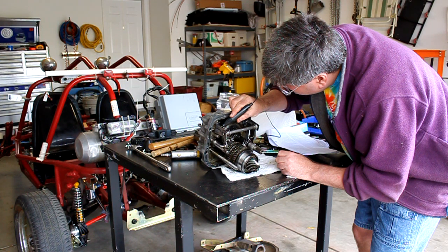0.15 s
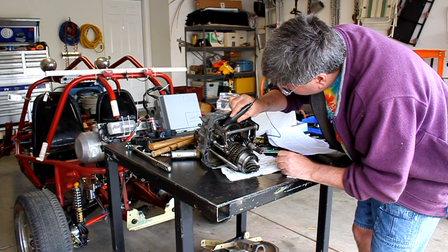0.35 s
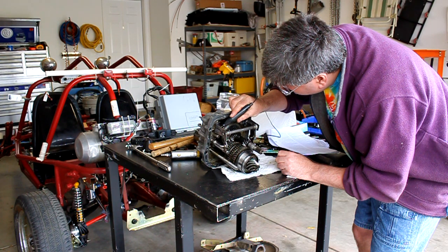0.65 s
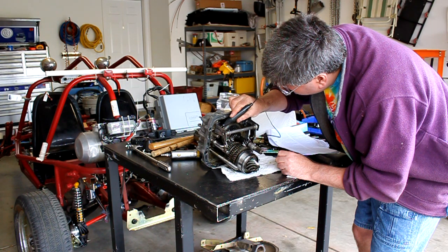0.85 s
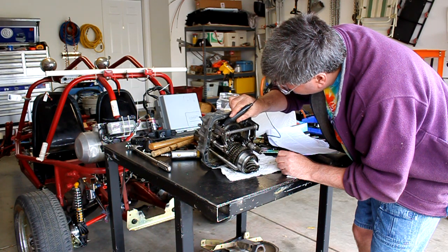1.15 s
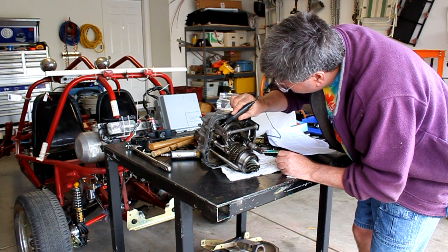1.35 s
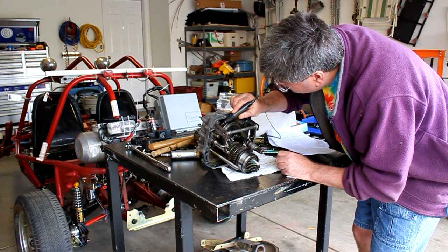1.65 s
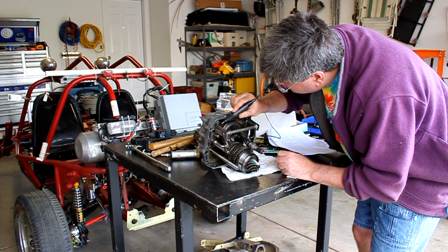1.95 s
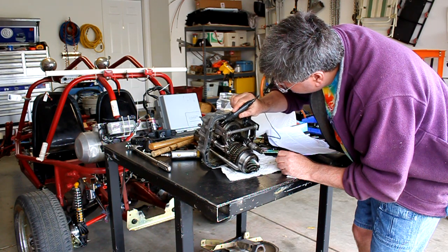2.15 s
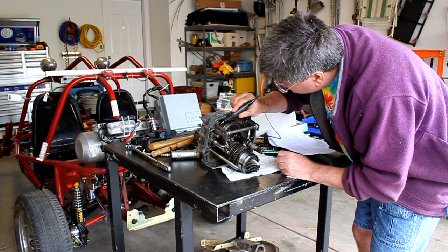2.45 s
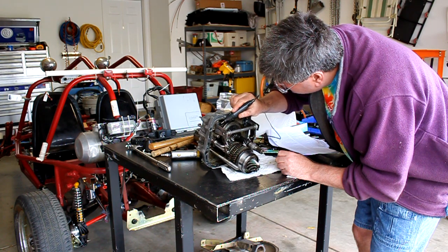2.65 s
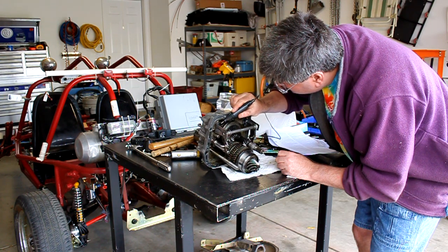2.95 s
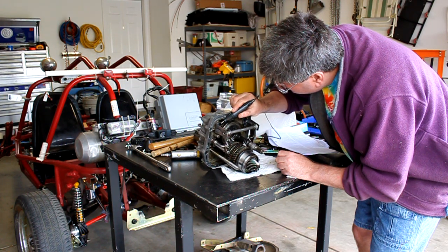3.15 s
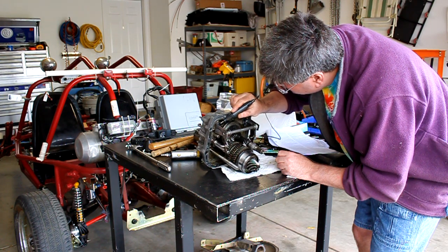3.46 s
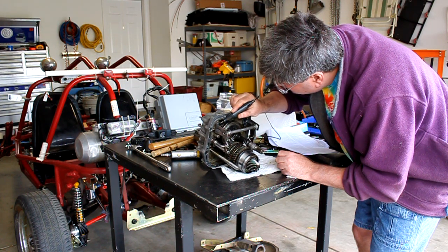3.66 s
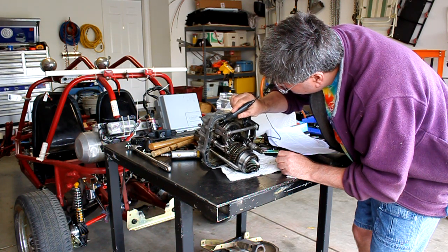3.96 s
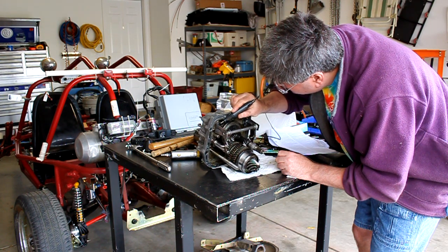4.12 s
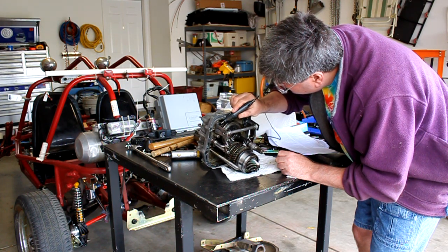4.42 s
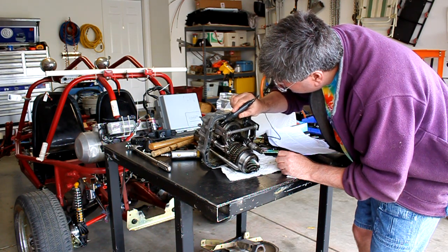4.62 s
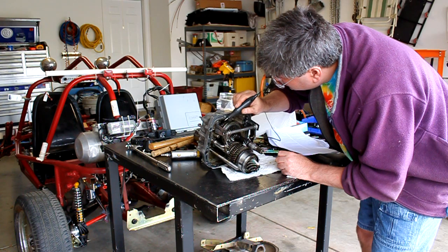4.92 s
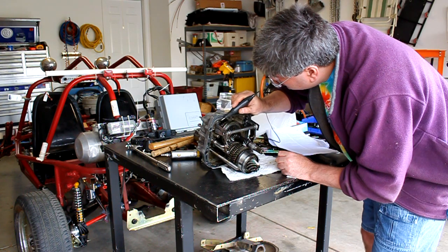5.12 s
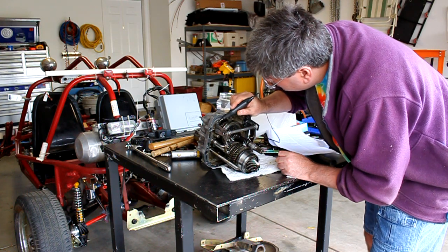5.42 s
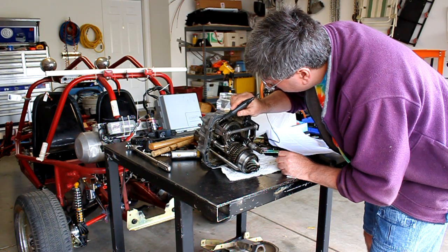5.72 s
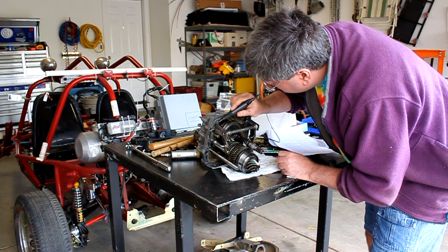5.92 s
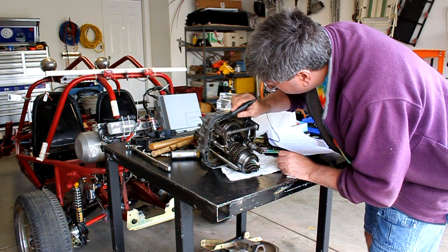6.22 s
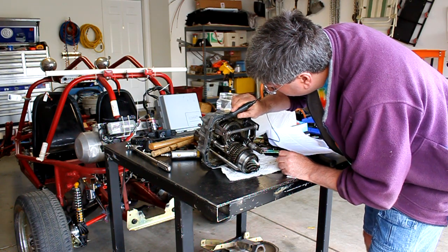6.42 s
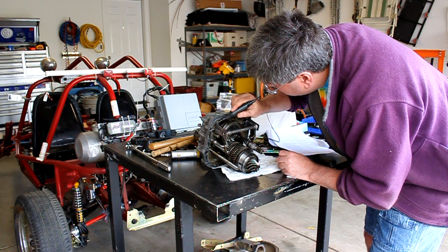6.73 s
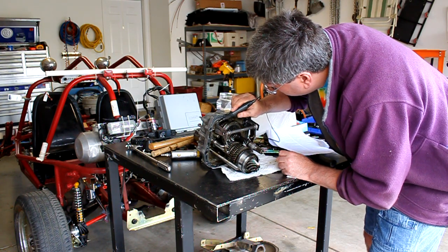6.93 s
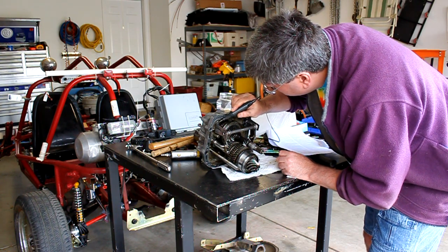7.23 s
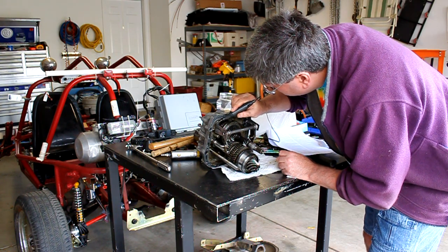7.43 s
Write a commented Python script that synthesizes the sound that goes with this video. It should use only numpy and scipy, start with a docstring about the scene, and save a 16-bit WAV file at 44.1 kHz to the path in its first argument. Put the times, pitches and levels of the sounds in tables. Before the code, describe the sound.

A small electric engraving tool whirs steadily and grinds against a steel part in short, gritty bursts in a garage.

```python
"""A small handheld rotary tool, pressed in nine bursts against a steel gear assembly in a garage.
The motor whirs on whole and half shaft orders, with air noise and a rotor-slot whine. Contact slows the
shaft, rings the part on whole orders and tears off chips: bright grit that pulses once a turn.
Single orders sing on resonances. Two soft bench knocks, quiet room tone, a short reverb; mono."""
import sys
import numpy as np
from scipy import signal
from scipy.fft import rfft, irfft, next_fast_len
from scipy.io import wavfile
from scipy.ndimage import uniform_filter1d, map_coordinates

SR = 44100
rng = np.random.default_rng(int(sys.argv[2]) if len(sys.argv) > 2 else 0)


def pcm_store(signal):
    """Save signal as 16-bit PCM."""
    levels = np.round(np.clip(np.atleast_2d(signal), -1, 1) * 32767)
    wavfile.write(sys.argv[1], SR, levels.astype(np.int16).T)


N = 334278
IDLE_HZ = 259.8

# One list per contact. Each row: time in seconds, shaft speed in Hz, part ring in dB, chips in dB.
CONTACTS = [
    [(0.0, 242, -23, -26), (0.04, 241.5, -21.5, -19), (0.072, 241.9, -25.5, -22), (0.229, 244.5, -28, -24),
     (0.284, 242.7, -29, -26), (0.332, 245, -25.5, -21.5), (0.46, 241.2, -28, -21),
     (0.57, 244.5, -26.5, -21.5), (0.62, 248.9, -28, -24.5), (0.693, 252.5, -26.5, -28),
     (0.713, 251.7, -22, -18), (0.733, 253.5, -33, -34), (0.768, 254.8, -25.5, -24), (0.79, 256, -33, -42),
     (0.84, 257.8, -36, -46)],
    [(0.9, 256, -34, -38), (0.965, 253.5, -29, -29), (1.05, 248.2, -29, -28), (1.11, 247.5, -29, -31),
     (1.19, 255, -45, -52)],
    [(2.5, 258.2, -38, -34), (2.555, 260.5, -27, -29), (2.62, 256.8, -32.5, -38),
     (2.645, 256.7, -26.5, -24), (2.76, 249.2, -23.5, -23), (2.83, 247, -23, -20),
     (2.88, 238.5, -23, -20.5), (2.95, 225.3, -23.5, -22.5), (3.05, 230.6, -26, -21.5),
     (3.16, 243, -25.5, -24.5), (3.215, 245.2, -20.5, -19.5), (3.28, 254.7, -40, -50)],
    [(3.35, 257.6, -39, -46), (3.377, 257.5, -26.5, -30), (3.457, 252.8, -27, -24.5),
     (3.5, 251.2, -27.5, -30), (3.78, 256.6, -28.5, -33.5), (3.86, 253.8, -28, -33),
     (3.92, 259.7, -46, -57)],
    [(4.065, 258.3, -23, -28), (4.085, 254.3, -22, -18.5), (4.13, 244.5, -23, -23.5),
     (4.171, 241.8, -27.5, -28), (4.2, 239.2, -24, -22), (4.28, 236, -28, -27.5), (4.31, 235.2, -21, -18.5),
     (4.4, 236.5, -24, -22.5), (4.45, 244, -24.5, -22), (4.58, 258, -37, -45)],
    [(4.9, 259.4, -36, -34.5), (5.26, 257.5, -45, -40), (5.29, 257.7, -32.5, -38.5),
     (5.757, 259.3, -35.5, -33.5), (5.88, 259.6, -32, -34), (5.92, 259.8, -33, -44)],
    [(6.292, 257.5, -24, -28), (6.306, 257.7, -24.5, -28), (6.331, 257.2, -27, -28),
     (6.366, 256.2, -19.5, -25.5), (6.41, 252.7, -25, -30), (6.46, 254.2, -32, -52)],
    [(6.475, 254.3, -26, -42), (6.495, 255.1, -23.5, -24.5), (6.554, 257.6, -29, -40),
     (6.59, 253.6, -21.5, -23.5), (6.67, 250, -22.5, -24), (6.71, 245.6, -21.5, -24),
     (6.775, 247.2, -20.5, -20), (6.88, 240.3, -23.5, -19.5), (6.94, 243, -25.5, -28.5),
     (6.99, 248.3, -38, -41)],
    [(7.02, 252.7, -37.5, -34), (7.059, 250.4, -21, -22), (7.089, 247.1, -27.5, -24),
     (7.13, 241.1, -22, -22), (7.19, 241.2, -23, -24.5), (7.25, 250.3, -27, -31.5),
     (7.333, 248.5, -20.5, -19), (7.368, 251.4, -24.5, -30.5), (7.443, 248.5, -29, -29),
     (7.52, 245.5, -25.5, -27), (7.62, 247, -23, -26)],
]
# Background level: motor, whine and room tone dip at times and creep slowly back. Each row: time in seconds,
# level in dB, half-order trim in dB.
BACKGROUND_LEVELS = [(0, -31, -17), (.85, -35.5, -5), (1.3, -34, -2), (2.5, -31, 1.5), (2.75, -32, 0),
                     (3.3, -32, -1), (3.95, -30, -3.5), (4.5, -32.5, -2.5), (4.9, -29.5, -2),
                     (4.95, -30, -22), (5.25, -29.5, -18), (5.3, -31.5, -9), (5.7, -29, 2),
                     (6.4, -28.5, -4), (7.0, -33, 3.5), (7.58, -32, -12)]


def amp(db):
    """Decibels to gain."""
    return 10 ** (np.asarray(db) / 20)


def unit_rms(x):
    """Scale to rms 1."""
    return x / np.sqrt(np.mean(x ** 2) + 1e-20)


def curves(rows):
    """Per-sample curve of each column after the first, which is time in seconds."""
    times_s, *columns = np.transpose(rows)
    return [np.interp(np.arange(N) / SR, times_s, column) for column in columns]


def colour(x, spectrum):
    """Filter by (Hz, dB) points, -90 dB outside them, then scale to rms 1."""
    size = next_fast_len(N)
    hz, db = np.transpose(spectrum)
    bins_hz = np.fft.rfftfreq(size, 1 / SR)
    gain = amp(np.interp(np.log(bins_hz + 1), np.log(hz), db, -90, -90))
    return unit_rms(irfft(rfft(x, size) * gain, size)[:N])


def wander(smooth_s):
    """Smooth random curve, rms 1."""
    width = max(int(smooth_s * SR), 2)
    return unit_rms(uniform_filter1d(uniform_filter1d(rng.standard_normal(N), width), width))


def repeating(cycles, gains, hold, drift, size=1024):
    """Cyclic wave with these harmonic gains; power share `drift` is renewed every `hold` cycles."""
    fresh = rng.standard_normal((2100, len(gains), 2)) @ [1, 1j] / np.sqrt(2)
    steady = np.exp(2j * np.pi * rng.random(len(gains)))
    harmonics = gains * (np.sqrt(1 - drift) * steady + np.sqrt(drift) * fresh)
    waves = irfft(np.pad(harmonics, ((0, 0), (1, 0))), size, axis=1)
    waves = np.concatenate([waves, waves[:, :1]], axis=1)
    return unit_rms(map_coordinates(waves, [cycles / hold, cycles % 1 * size], order=1))


def pulsing_noise(turns, depth_db, grain_db):
    """Grainy noise that swells once a turn."""
    swell_db = depth_db * (np.cos(2 * np.pi * turns) + .28 * np.cos(4 * np.pi * turns))
    return rng.standard_normal(N) * amp(swell_db + grain_db * wander(.001))


def follow_background_db(offset_db, slope):
    """Background level, offset, with its swings scaled by `slope`."""
    level_db = curves(BACKGROUND_LEVELS)[0]
    return level_db.mean() + offset_db + slope * (level_db - level_db.mean())


def touching(contact):
    """1 while the bit is on the part: quick landing, softer lift."""
    start_s, end_s = contact[0][0], contact[-1][0]
    return curves([(start_s, 0), (start_s + .0013, 1), (end_s - .015, 1), (end_s, 0)])[0]


def shaft_turns(spin_up_s=.13):
    """Turns so far. Contact drags the speed down; longer pauses let it regain idle."""
    speed_points = []
    for contact, following in zip(CONTACTS, CONTACTS[1:] + CONTACTS[:1]):
        speed_points += [row[:2] for row in contact]
        lift_s = contact[-1][0]
        if following[0][0] - lift_s > 2 * spin_up_s:
            speed_points.append((lift_s + spin_up_s, IDLE_HZ))
    return np.cumsum(curves(speed_points)[0]) / SR


def motor(turns):
    """Whole orders from unbalance, half orders from a bearing rattling every second turn, and air."""
    # Housing tones. Each row: multiple of half the shaft speed, relative level in dB.
    orders = [(8, -5), (9, -20), (10, -3), (11, -2), (12, -3), (13, -5), (14, -4), (15, -4), (16, -1),
              (17, -2), (18, -3), (19, -2), (20, -5), (21, -12), (22, -8), (23, -4), (24, -13), (25, -9),
              (26, -6), (27, -10), (28, -3), (29, -3), (30, -6), (31, -3), (32, -8), (33, -6), (34, -10),
              (35, -6), (36, -12), (37, -11), (38, -16), (39, -13), (40, -8)]
    # Noise spectra. Each row: frequency in Hz, relative level in dB.
    rattle_spectrum = [(5100, -38), (5400, -1.5), (6500, -1), (7500, -9), (9700, -5.5), (10600, -3.5),
                       (14500, 0.5), (15800, -20)]  # fine rattle above the tones
    air_spectrum = [(500, -9.5), (1200, -6), (1700, 1), (2250, 1), (2650, -2.5), (3200, -5), (3900, -1),
                    (4800, -6.5), (6000, -7), (7500, -42.5), (13500, -55.5), (15800, -81)]  # fan and brushes
    level_db, half_db = curves(BACKGROUND_LEVELS)
    multiples, order_db = np.transpose(orders)
    gains = np.pad(amp(order_db), (int(multiples[0]) - 1, 0))  # the small housing radiates nothing lower
    odd = np.arange(1, len(gains) + 1) % 2
    whole = repeating(turns / 2, gains * (1 - odd), hold=11, drift=.4)
    half = repeating(turns / 2, gains * odd, hold=6, drift=.4)
    jitter = .0015 * wander(.008)  # smears the highest orders
    rattle = colour(repeating(turns / 2 + jitter, np.ones(125), hold=3, drift=1), rattle_spectrum)
    air = colour(pulsing_noise(turns, depth_db=2.5, grain_db=-1.5), air_spectrum)
    air_db = .13 * half_db - 7  # thins with the half orders as the bearing steadies
    mix = amp(-6) * whole + amp(half_db - 5.5) * half + amp(-5) * rattle + amp(air_db) * air
    return amp(level_db) * mix


def slot_whine(turns, order=39, touched_gain=.53, slack_hz=2.1, fade_db_per_hz=2):
    """Rotor-slot tone. Drops on contact and fades as the shaft is dragged below idle."""
    in_contact = sum(map(touching, CONTACTS))
    duck = uniform_filter1d(1 - (1 - touched_gain) * in_contact, int(.08 * SR))
    drag_hz = np.maximum(IDLE_HZ - slack_hz - np.gradient(turns) * SR, 0)
    level_db = follow_background_db(offset_db=-11.5, slope=1.37) - fade_db_per_hz * drag_hz
    phase = 2 * np.pi * order * (turns + .003 * wander(.02))
    return np.sqrt(2) * duck * amp(level_db) * np.cos(phase)


def singing_orders(turns):
    """Single shaft orders sing with a slight waver, under load or while on a resonance."""
    # Tones in contact only. Each row: start and end in seconds, order, level in dB re the part ring.
    loaded = [(0, 7.65, 4, -20.5), (6.52, 7.6, 15, -8), (6.52, 7.36, 16, -9.5)]
    # Tones on a resonance. Each row: start and end in seconds, order, level in dB.
    resonant = [(0, 0.46, 13, -41), (0, 0.6, 15, -37.5), (0, 0.63, 12, -38.5), (0.17, 0.612, 8, -38.5),
                (0.31, 0.46, 9, -35.5), (0.299, 0.6, 18, -37), (0.35, 0.54, 14, -33), (0.33, 0.65, 2, -52),
                (1.199, 2.5, 4, -58), (2.661, 2.82, 9, -33.5), (3.121, 3.297, 2, -51),
                (3.33, 3.502, 16, -34), (3.34, 3.643, 11, -36), (3.45, 3.869, 17, -38),
                (3.47, 4.074, 6, -41), (3.399, 4.04, 5, -43), (3.57, 3.863, 2, -49.5),
                (4.058, 4.14, 13, -37), (4.06, 4.34, 7, -37.5), (4.1, 4.32, 2, -49.5),
                (4.114, 4.375, 14, -31.5), (4.172, 4.498, 10, -34), (4.601, 6.021, 4, -52.5),
                (4.68, 5.8, 6, -42.5), (5.8, 6.339, 6, -36.5), (4.7, 6.299, 36, -54), (7.08, 7.22, 16, -32),
                (3.397, 4.5, 1, -60), (4.9, 5.852, 14, -38.5), (4.93, 5.85, 24, -46),
                (4.879, 5.449, 17, -38.5), (4.89, 5.3, 16, -37.5), (4.928, 5.28, 23, -46),
                (5.028, 5.276, 12, -42), (4.93, 5.281, 7, -51), (4.93, 5.301, 15, -43.5),
                (2.2, 2.549, 14, -41), (5.301, 6.32, 6.5, -40), (5.398, 5.81, 8, -38),
                (6.37, 6.779, 2, -46), (6.54, 6.72, 13, -33), (6.542, 6.717, 16, -27.5),
                (6.822, 6.93, 10, -29.5), (7.289, 7.65, 4, -43), (7.398, 7.648, 7, -36),
                (7.434, 7.647, 8, -33)]
    t = np.arange(N) / SR
    turns = turns + .0085 * wander(.03)  # slightly uneven rotation
    waver = amp(2.1 * wander(.02))
    ring_gain = sum(touching(contact) * amp(curves(contact)[1]) for contact in CONTACTS)

    def tone(order):
        own_waver = np.roll(waver, 9000 * round(order))
        return np.sqrt(2) * own_waver * np.cos(2 * np.pi * order * turns)

    out = np.zeros(N)
    for start_s, end_s, order, db in loaded:
        out += amp(db) * ring_gain * ((t > start_s) & (t < end_s)) * tone(order)
    for start_s, end_s, order, db in resonant:
        first, last = round(start_s * SR), round(end_s * SR)
        swell = signal.windows.tukey(last - first, .4)[:N - first]
        out[first:last] += amp(db) * swell * tone(order)[first:last]
    return out


def cutting(turns, squeal_from_s=6.52):
    """The bit meets the same bumps each turn (tones) and tears off chips (noise); both ring the part."""
    # Spectra. Each row: frequency in Hz, relative level in dB.
    lower_spectrum = [(350, -25), (600, -20), (807, -16.5), (968, -5.5), (1060, -5.5), (1690, 1.5),
                      (2320, 5.5), (2660, 0.5), (3000, -4.5), (3900, -115), (6600, -120)]  # lower ring of the part
    upper_spectrum = [(1530, -68), (2600, -38.5), (2730, -27.5), (2890, 5), (3260, 12), (5520, 6.5),
                      (6000, -3.5), (7800, -35), (13200, -120)]  # upper ring
    grit_spectrum = [(5000, -97), (5800, 1), (7100, 0), (8400, 0.5), (10100, 4.5), (11400, 3), (12200, -53)]  # chips
    fizz_spectrum = [(11000, -22), (12100, 11.5), (13000, 6), (14000, 8), (15000, 7.5), (15900, -6)]  # finest chips
    squeal_spectrum = [(2600, -25), (3200, -7), (3600, -8), (3850, -2.5),
                       (4150, -7), (4500, -8), (5500, -12), (7000, -23)]
    # Spot worked in each contact. Each row: upper over lower ring in dB, fizz over grit in dB.
    spots = [(2.5, 3.5), (0, 3.5), (3.5, 4.5), (2, 3.5), (1.5, 3.5), (0.5, -1.5), (1, -5), (5, -4),
             (5.5, -3.5)]
    bumps = repeating(turns + .006 * wander(.006), np.ones(66), hold=10, drift=1)
    chips = unit_rms(pulsing_noise(turns, depth_db=2.5, grain_db=.5))

    def band(spectrum, tonal):
        return np.sqrt(tonal) * colour(bumps, spectrum) + np.sqrt(1 - tonal) * colour(chips, spectrum)

    # Short waves lose their turn-to-turn likeness first.
    lower = band(lower_spectrum, tonal=.55)
    upper = band(upper_spectrum, tonal=.5)
    squeal = band(squeal_spectrum, tonal=.5)
    grit = band(grit_spectrum, tonal=.4)
    fizz = band(fizz_spectrum, tonal=.3)
    upper = np.where(np.arange(N) < squeal_from_s * SR, upper, squeal)  # bit moves to a squealing spot
    chatter = amp(.74 * wander(.0057))  # unsteady hand
    fizz = unit_rms(fizz * amp(1.25 * wander(.018)))  # comes in spurts
    out = np.zeros(N)
    for contact, (upper_db, fizz_db) in zip(CONTACTS, spots):
        _, ring_db, chips_db = curves(contact)
        ring = (lower + amp(upper_db) * upper) / np.hypot(1, amp(upper_db))
        torn = (grit + amp(fizz_db) * fizz) / np.hypot(1, amp(fizz_db))
        out += touching(contact) * (amp(ring_db) * ring + amp(chips_db) * torn)
    return out * chatter


def room_tone():
    """Faint low noise that follows the background level."""
    # Room noise. Each row: frequency in Hz, relative level in dB.
    spectrum = [(15, -51), (25, -22), (179, -6.5), (450, -4), (522, -2), (817, -11), (880, -5),
                (1140, -8.5), (1940, -120)]
    level_db = follow_background_db(offset_db=-18.5, slope=1.8)
    return amp(level_db) * colour(rng.standard_normal(N), spectrum)


def garage_reverb(x, t60_s):
    """Diffuse tail: decaying noise of energy 1, starting after 6 ms."""
    t = np.arange(SR // 2) / SR
    tail = rng.standard_normal(len(t)) * amp(-60 * t / t60_s) * (t > .006)
    return signal.oaconvolve(x, tail / np.linalg.norm(tail))[:N]


def bench_knocks(attack_s=.006):
    """Dull thuds on the bench: three damped inharmonic tones each."""
    # Each row: start in seconds, level in dB, middle tone in Hz, 60 dB decay time in seconds.
    knocks = [(0.19, -33.5, 368, 0.12), (1.554, -36, 517, 0.13)]
    out, t = np.zeros(N), np.arange(8000) / SR
    for start_s, db, hz, t60_s in knocks:
        modes_hz = hz * np.array([[.72], [1], [1.37]])
        envelope = amp(db - 60 * t / t60_s) * np.minimum(t / attack_s, 1)
        out[round(start_s * SR):][:len(t)] += envelope * np.sin(2 * np.pi * modes_hz * t).sum(0) / 2
    return out


def scene():
    """Tool, part and bench in the garage; two identical channels."""
    turns = shaft_turns()
    direct = motor(turns) + slot_whine(turns) + singing_orders(turns) + cutting(turns) + bench_knocks()
    mono = direct + room_tone() + amp(-14) * garage_reverb(direct, t60_s=.35)
    return np.array([mono, mono])


def record(dry):
    """Low-pass at 15850 Hz."""
    lowpass = signal.firwin(511, 15850, window=("kaiser", 9), fs=SR)
    return signal.oaconvolve(dry, lowpass[None], "same")


dry = scene()
out = record(dry)
pcm_store(out)
```